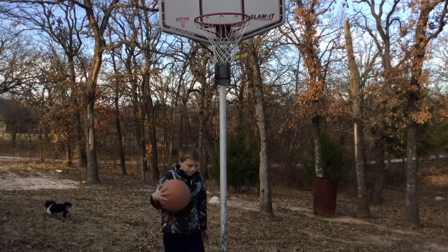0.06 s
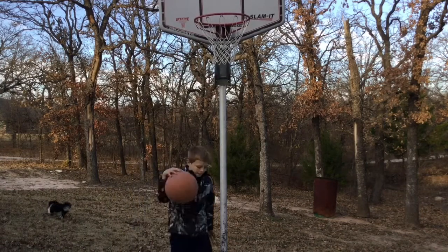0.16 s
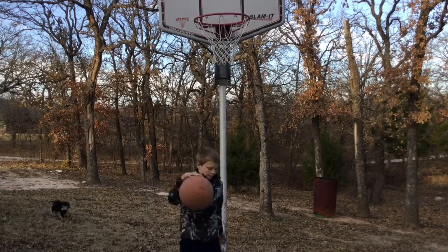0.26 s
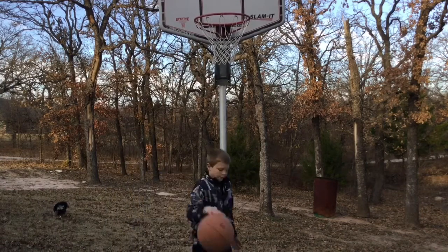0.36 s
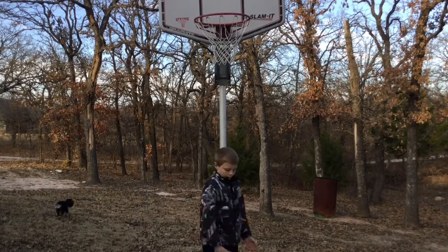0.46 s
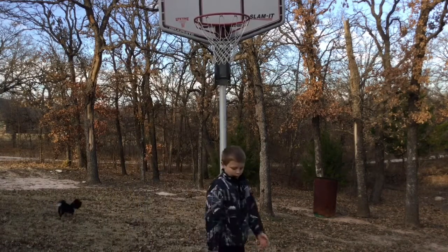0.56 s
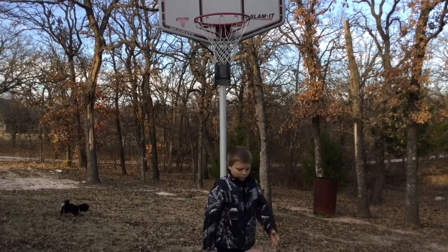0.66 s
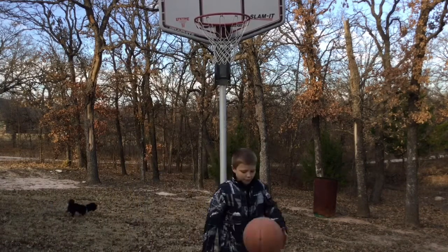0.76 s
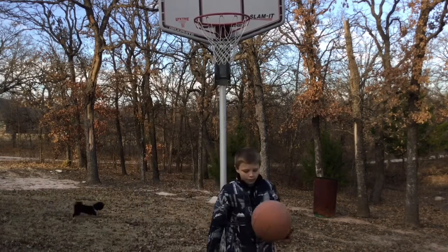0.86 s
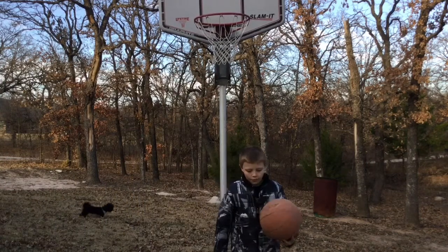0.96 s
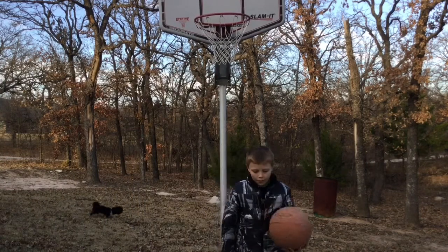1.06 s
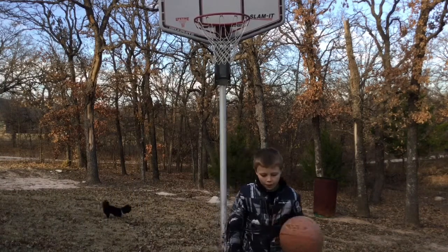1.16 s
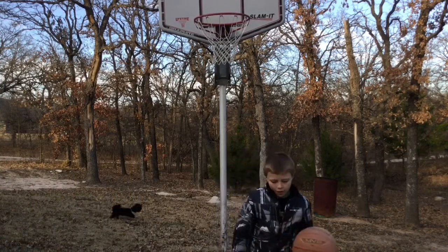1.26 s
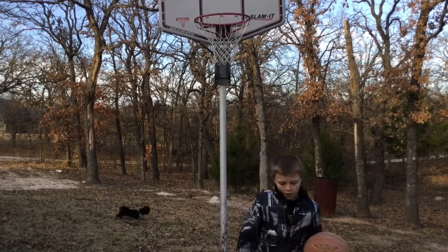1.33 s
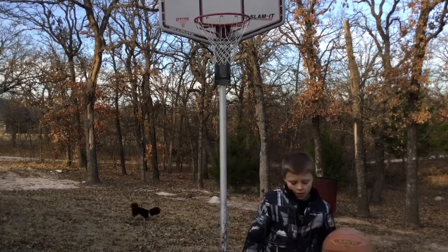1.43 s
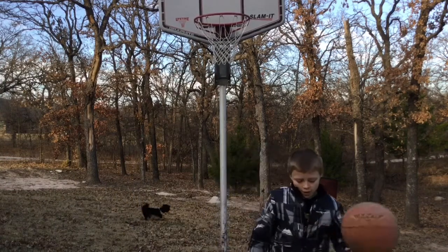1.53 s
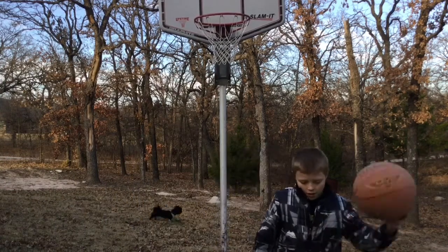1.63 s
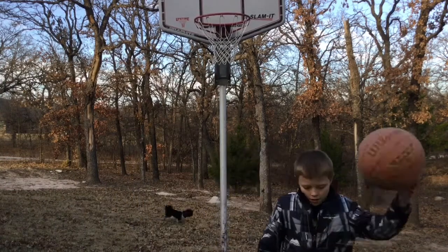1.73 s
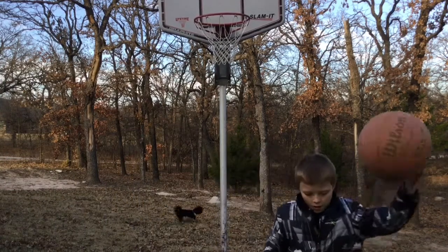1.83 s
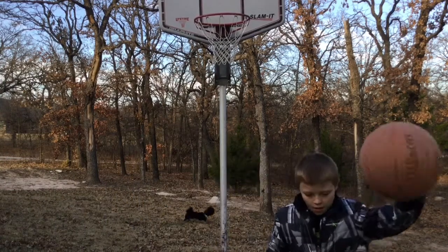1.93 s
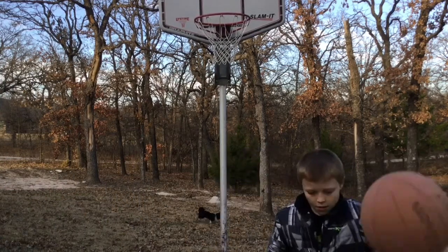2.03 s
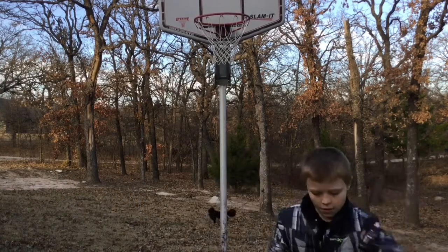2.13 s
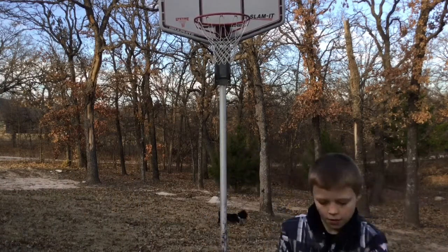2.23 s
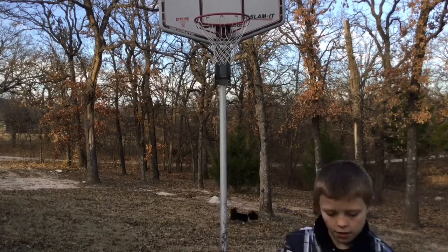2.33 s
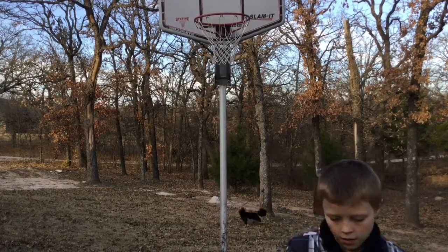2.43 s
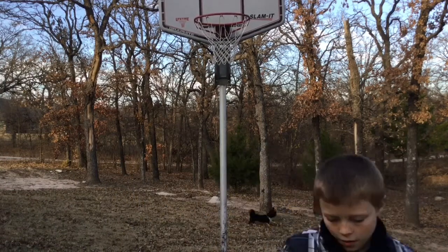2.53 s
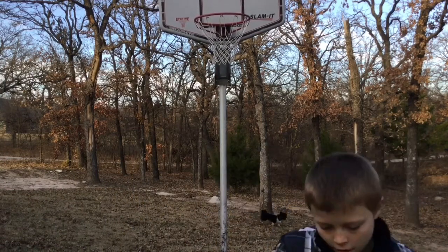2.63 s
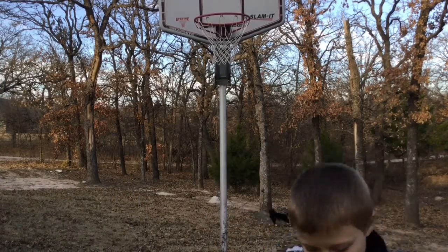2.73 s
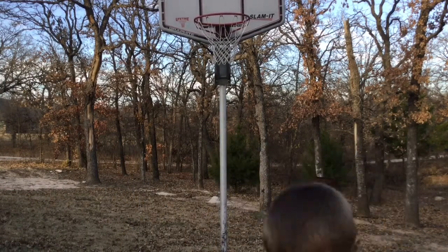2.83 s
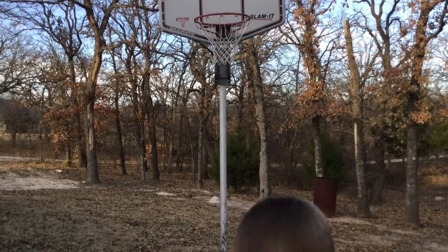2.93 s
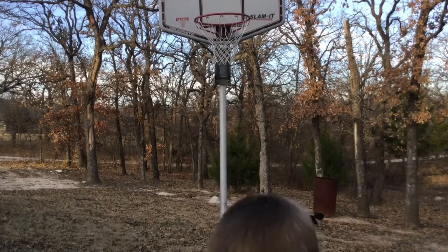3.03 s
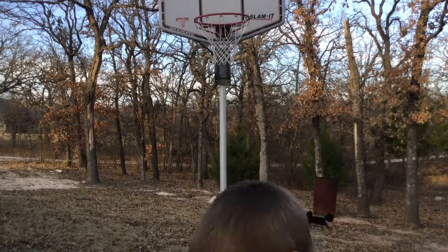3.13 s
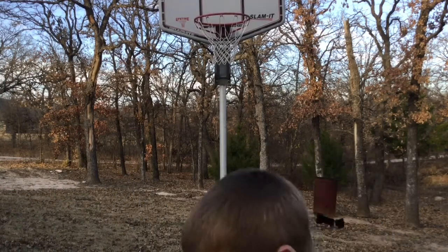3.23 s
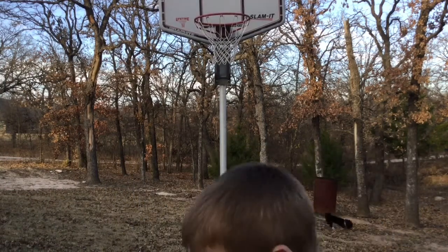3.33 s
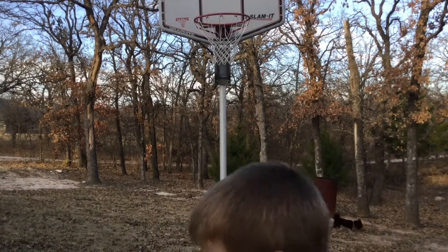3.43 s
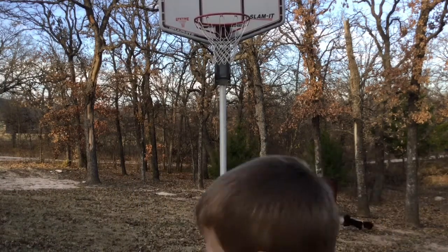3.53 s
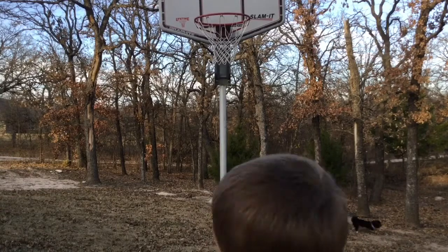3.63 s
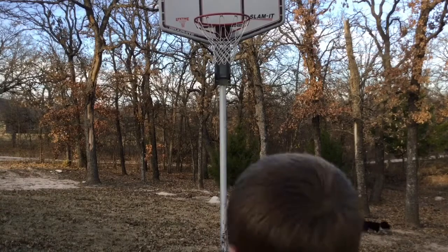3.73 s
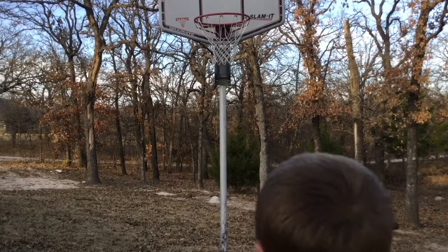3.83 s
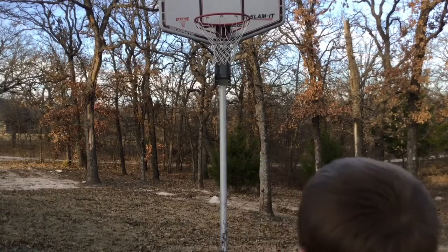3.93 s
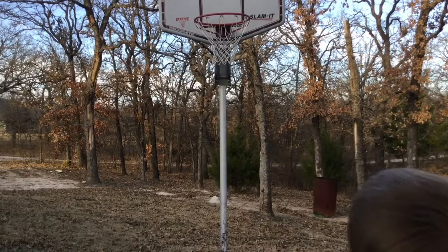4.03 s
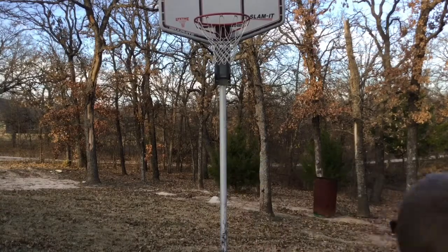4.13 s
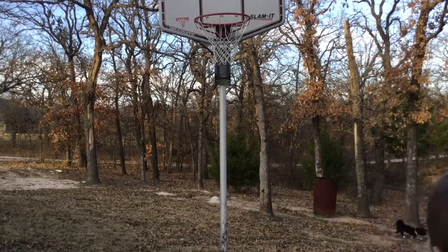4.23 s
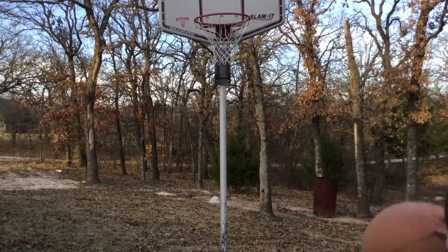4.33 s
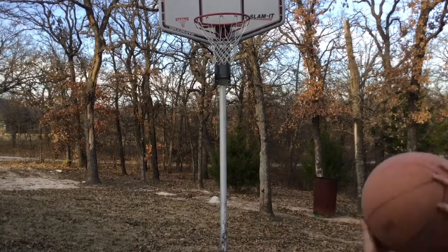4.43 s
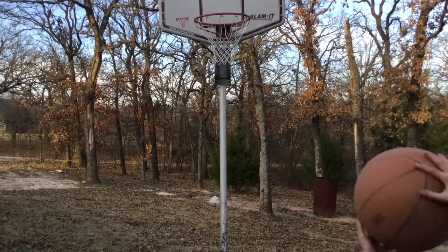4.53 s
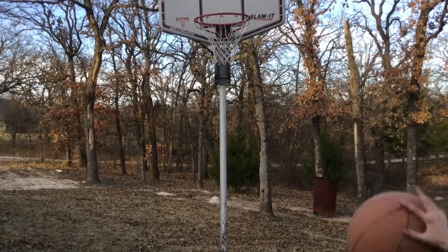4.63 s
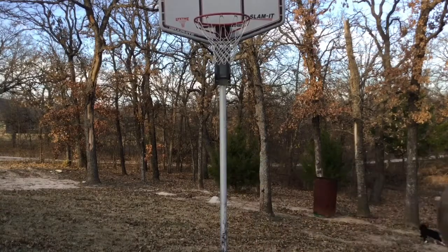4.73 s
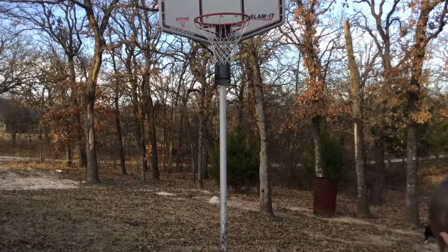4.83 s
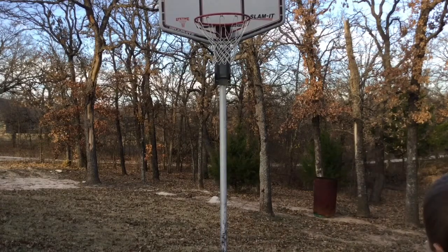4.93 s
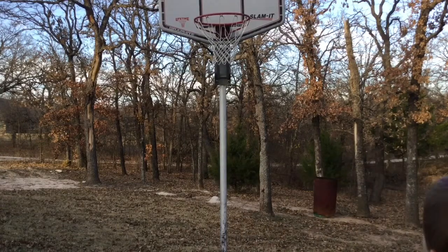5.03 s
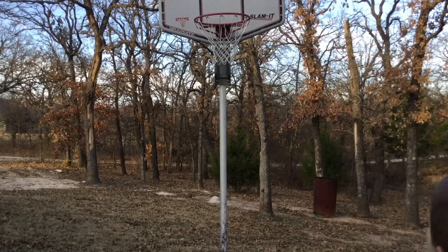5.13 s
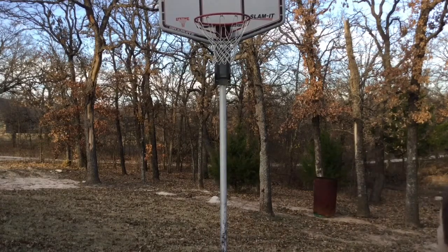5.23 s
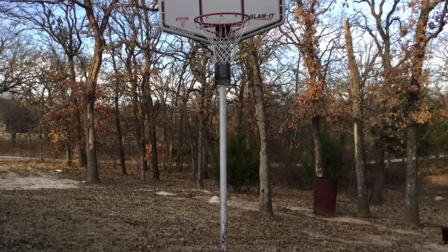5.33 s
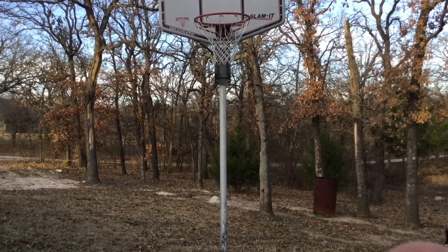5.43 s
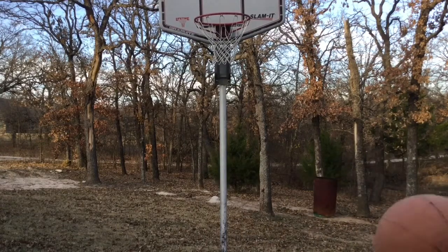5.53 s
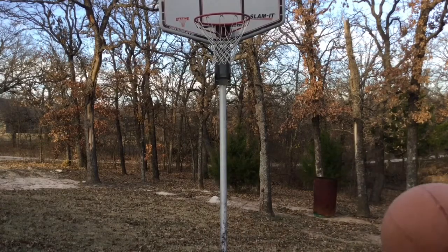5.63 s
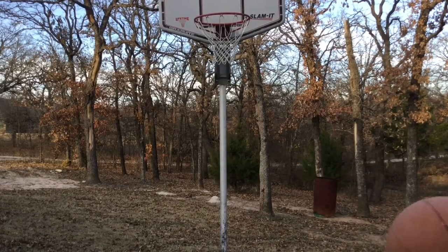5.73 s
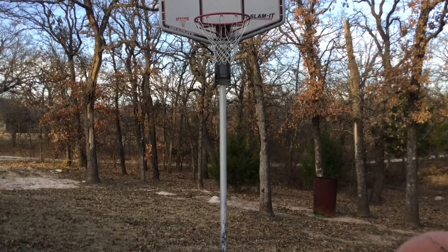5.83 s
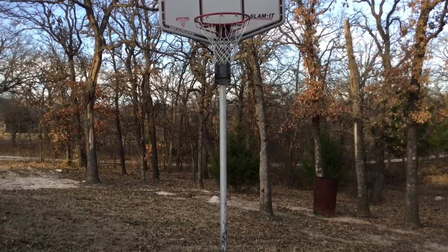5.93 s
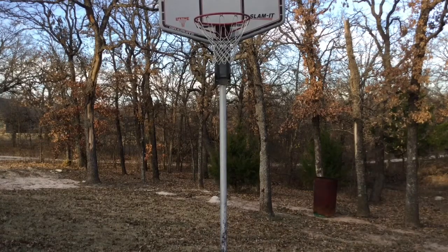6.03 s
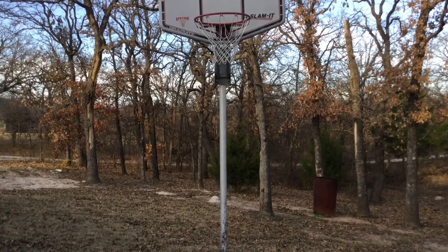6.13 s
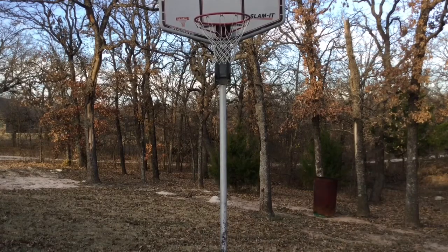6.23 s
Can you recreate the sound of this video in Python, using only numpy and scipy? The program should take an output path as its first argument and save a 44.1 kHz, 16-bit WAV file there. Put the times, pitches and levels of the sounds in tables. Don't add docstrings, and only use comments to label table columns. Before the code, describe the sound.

A basketball bounces three times on hard dry ground in a wooded yard, amid nylon jacket swishes, palm pats and crunching twigs underfoot.

```python
import sys
import numpy as np
from scipy import signal
from scipy.io import wavfile
from scipy.ndimage import uniform_filter1d

SR = 44100
rng = np.random.default_rng(int(sys.argv[2]) if len(sys.argv) > 2 else 0)


def to_wav(sig):
    pcm = np.clip(np.atleast_2d(sig), -1, 1) * 32767
    pcm = np.round(pcm).astype(np.int16)
    wavfile.write(sys.argv[1], SR, pcm.T)


def attenuation_scalar(level_db):
    decades = np.asarray(level_db, float) / 20
    return 10 ** decades


N = 276948

BALL_RADIUS_M = .1175
REDUCER_HZ, REDUCER_DEPTH_DB = 1600, -17
# root of the spherical cavity mode [-], level [dB], t60 [s]
CAVITY_MODES = [(2.08, 5, 0.14), (3.34, -11, 0.15), (4.51, -7, .2), (5.55, -11, 0.18), (5.92, -12, .6),
                (6.76, -15, .2), (7.23, -15, 0.25), (7.64, -17, .22), (8.44, -17, .22), (9.04, -16, .22)]


def at_hz(points, hz):
    table = np.array(points)
    return np.interp(np.log(hz), np.log(table[:, 0]), table[:, 1])


def band(x, low_hz, high_hz):
    edges = [low_hz, min(high_hz, .45 * SR)]
    return signal.sosfilt(signal.butter(2, edges, "band", fs=SR, output="sos"), x)


def rms_one(x):
    return x / np.sqrt(np.mean(x ** 2) + 1e-30)


def drift(rate_hz):
    steps = rng.standard_normal(int(N / SR * 60) + 2)
    memory = np.exp(-2 * np.pi * min(rate_hz, 25) / 60)
    slow = rms_one(signal.lfilter([1], [1, -memory], steps))
    return np.interp(np.arange(N) / SR * 60, np.arange(len(slow)), slow)


def resonate(x, peaks):
    out = 0
    for k, (hz, width_hz, db, late_ms) in enumerate(peaks):
        r = np.exp(-np.pi * width_hz / SR)
        poles = [1, -2 * r * np.cos(2 * np.pi * hz / SR), r * r]
        late = np.roll(x, int(late_ms * SR / 1000))
        ring = (1 - r * r) / 2 * signal.lfilter([1, 0, -1], poles, late)
        out = out + (-1) ** k * attenuation_scalar(db) * ring
    return out


def add(out, piece, s):
    i = round(s * SR)
    out[i:i + len(piece)] += piece[:N - i]


def cavity_hz(root):
    return root * 343 / (2 * np.pi * BALL_RADIUS_M)


def background(patchy_db=4.5, waver_db=2.0):
    # f [Hz], density [dB per Hz]
    air_colour = [(24, -61), (40, -33), (99, -12.5), (176, -4.5), (283, -3), (345, -1.5), (422, -19),
                  (600, -6), (697, -11.5), (1180, -15), (1760, -48), (2260, -48), (11800, -54.5),
                  (16000, -61)]
    # multiple of mains [-], level [dB rms]
    hum_partials = [(2, -70), (3, -64.5), (4, -70), (5, -88), (6, -75), (7, -82.5), (8, -71.5), (9, -74.5),
                    (10, -66), (12, -86), (14, -85.5), (18, -75.5), (20, -82)]
    t = np.arange(N) / SR
    edges = 40 * 2 ** np.arange(0, 8.7, 1 / 3)
    white = rng.standard_normal((2, N))
    air = 0
    for k, (low, high) in enumerate(zip(edges, edges[1:])):
        steep = band(band(white[k % 2], low, high), low / 1.2, high * 1.2)
        hiss_db = -REDUCER_DEPTH_DB * (low > REDUCER_HZ)
        patches_db = patchy_db * drift(4.1) * (hiss_db == 0)
        air = air + steep * attenuation_scalar(at_hz(air_colour, np.sqrt(low * high)) + hiss_db + patches_db)
    buzz = 0
    for multiple, db in hum_partials:
        level = np.sqrt(2) * attenuation_scalar(db + waver_db * drift(3.6))
        buzz = buzz + level * np.cos(2 * np.pi * multiple * 59.95 * t + 2.5 * drift(0.89))
    return attenuation_scalar(-59) * rms_one(air) + buzz


def whistles(calls, fall, blur_hz, rough):
    out = np.zeros(N)
    pole = np.exp(-2 * np.pi * blur_hz / SR)
    for s, length, hz, db in calls:
        t = np.arange(int(length * SR)) / SR
        slow = signal.lfilter([1], [1, -pole], rng.standard_normal((2, SR // 2)))
        a, b = slow[:, -len(t):]
        wander = 1 + rough * rms_one(a) + 1j * rough * rms_one(b)
        tone = np.real(wander * np.exp(2j * np.pi * hz * t * (1 - fall * t)))
        add(out, attenuation_scalar(db) * np.hanning(len(t)) * tone, s)
    return out


def bird():
    bird_calls = [(.522, 0.054, 3127, -63.5), (1.205, 0.03, 4600, -76), (5.981, 0.011, 3340, -60.5),
                  (5, 0.051, 4930, -78.5), (5.712, 0.03, 4185, -75.5), (5.81, .025, 5454, -71)]
    return whistles(bird_calls, fall=.26, blur_hz=90, rough=.7)


def twitter():
    more_calls = [(5.69, .05, 5050, -75), (5.735, .03, 2800, -74.5), (5.812, .04, 3300, -73.5),
                  (5.83, .05, 5450, -78), (5.975, .025, 4600, -78)]
    return whistles(more_calls, fall=.2, blur_hz=90, rough=0.897)


def creaks():
    finger_creaks = [
        (1.48, 0.39, 2305, -72),
        (1.70, 0.2, 2050, -69.5),
    ]
    return whistles(finger_creaks, fall=.05, blur_hz=130, rough=3)


def strokes_in_time(strokes, attack_s, release_db_per_s):
    s, length, level_db, swell_db = np.transpose(strokes)[:4, :, None]
    since = np.arange(0, N / SR, .001) - s
    length = np.maximum(length, .005)
    swelling_db = swell_db * np.clip(since / length, 0, 1)
    shape_db = level_db + swelling_db - release_db_per_s * np.maximum(since - length, 0)
    return attenuation_scalar(shape_db) * np.exp(np.minimum(since / attack_s - 1, 0))


def together(gains):
    total = np.sqrt(np.sum(gains ** 2, axis=0))
    return np.interp(np.arange(N) / SR * 1000, np.arange(len(total)), total)


def friction(strokes, colour, pivot_hz, attack_s, release_db_per_s, grit_db, grains_per_s, smooth,
             flutter_db, own_db):
    band_edges = [180, 380, 700, 1100, 1500, 2200, 3100, 4300, 6000, 8300, 11500, 16000]
    gains = strokes_in_time(strokes, attack_s, release_db_per_s)
    tilt_db = np.sum(np.array(strokes)[:, 4:], axis=1, keepdims=True)
    sizes = attenuation_scalar(grit_db * np.minimum(rng.exponential(1, N), 5))
    grains = (rng.random(N) < grains_per_s / SR) * sizes
    sources = rms_one(grains * rng.choice([-1, 1], (2, N))) + smooth * rng.standard_normal((2, N))
    flutter, out = drift(57), 0
    for k, (low, high) in enumerate(zip(band_edges, band_edges[1:])):
        hz = np.sqrt(low * high)
        if high > .8 * colour[0][0] and low < .9 * colour[-1][0]:
            hiss = rms_one(band(sources[k % 2], low, high)) * np.sqrt((high - low) / pivot_hz)
            level = attenuation_scalar(at_hz(colour, hz) + flutter_db * flutter + own_db * drift(19))
            out = out + hiss * level * together(gains * attenuation_scalar(tilt_db * np.log2(hz / pivot_hz)))
    return out


def crunches():
    steps = [(.155, 0.19, -68, 1.5, 3), (.79, 0.13, -66, -11, 13), (1.03, 0.15, -70.5, -2, -9),
             (2.22, 0.27, -70.5, 18, -2.5), (2.895, 0.024, -63, -4.5, 12), (3.34, 0.072, -63.5, 14.5, 2),
             (3.405, .1, -55, -7, -0.5), (3.78, 0.097, -56, -18, 0.5), (4.11, 0.079, -70, 2, -1.5),
             (4.21, 0.06, -70, 3.5, -6.5), (4.505, 0.038, -56.5, -12.5, 3.5), (4.98, .05, -79.5, 5, -2.5),
             (5.035, .11, -80, -5, -5.5), (5.69, .09, -79, -0.36, 2), (5.812, 0.11, -76.5, -7.5, 0)]
    litter = [(1000, -12.5), (1600, -1), (2600, 2.5), (3900, 1), (7100, -16.5), (8750, -22.5),
              (16000, -38.5)]
    return friction(steps, litter, pivot_hz=3042, attack_s=.007, release_db_per_s=405.5,
                    grit_db=1.5, grains_per_s=1500, smooth=.6, flutter_db=0.0, own_db=5.5)


def swishes():
    # t [s], length [s], level [dB], swell by the end
    # [dB], tilt [dB per octave]
    sleeve_slides = [(.02, 0.12, -63, -8.5, -4), (.15, 0.23, -58, -4, -4), (.415, 0.054, -55, -10.5, -4),
                     (.555, 0.032, -70.5, 19.5, -2.2), (.72, 0.13, -60.5, 4, -2.5), (.96, 0.19, -62.5, 2, -0.3),
                     (1.165, 0.062, -60.5, 6, 1), (1.275, 0.14, -50.5, -1.5, 0.8), (1.41, 0.034, -47, -5, 0.5),
                     (1.498, 0.11, -46, -3.5, -0.3), (1.61, 0.12, -55.5, -6, 4),
                     (1.705, 0.019, -45.5, -2, -1.5), (1.735, 0.2, -53, 2, 0.4), (1.96, 0.058, -63, 1, 6.5),
                     (2.07, 0.08, -55.5, -5, -1.1), (2.17, 0.069, -62, 12.5, 3.5), (2.215, 0.2, -50, -6, -0.9),
                     (2.44, 0.11, -57, -3, 1), (2.63, 0.016, -66, 3, 9), (2.665, .15, -63, 0, 7),
                     (2.83, 0.086, -65.5, 9, -5), (3.02, 0.02, -61.5, 5.5, -4),
                     (3.226, 0.022, -86, 9, 11), (3.554, 0.021, -71, -4, 13.5), (3.674, 0.028, -56.5, -10, 5),
               (3.713, 0.11, -54.5, 4.5, 0), (4.155, 0.013, -59.5, 3, -4.5), (4.228, 0.041, -66.5, 4, 14.5),
               (5.013, 0.022, -67, 1, 4), (5.71, .05, -85, -1, 1.5), (5.81, .09, -78.5, -4, 2.5)]
    nylon = [(1200, -12.5), (2200, -2.5), (2700, -12.5), (3600, -2.5), (6650, -2.5), (12000, -6),
             (16000, -8)]
    return friction(sleeve_slides, nylon, pivot_hz=7700, attack_s=0.036, release_db_per_s=749.0,
                    grit_db=1.5, grains_per_s=2000, smooth=.8, flutter_db=2.0, own_db=3.5)


def rubs():
    palm_strokes = [(.02, 0.031, -48, -13), (.155, 0.083, -52.5, 5), (.25, 0.079, -53, -2.5),
                    (.42, 0.089, -68, 5), (.72, 0.13, -59, 4), (1.81, 0.07, -57, -6),
                    (2.22, 0.29, -69.5, 5), (2.48, 0.27, -55.5, -11.5), (2.89, 0.13, -62.5, -3.5),
                    (3.17, 0.26, -58, 3), (4.5, 0.045, -57, 1), (5.0, 0.042, -62.5, -2.5)]
    rubber = [(250, 1.5), (450, -6), (950, -5), (1800, -6), (2800, -20.5), (5000, -35.5)]
    return friction(palm_strokes, rubber, pivot_hz=1010, attack_s=0.014, release_db_per_s=399.0,
                    grit_db=1.5, grains_per_s=710, smooth=0.75, flutter_db=2.5, own_db=3.5)


def moves(hum_db=-3.0):
    out = swishes() + crunches() + rubs()
    near = np.arange(N) < 3.5 * SR
    modes = [(cavity_hz(root), 14.0, hum_db + db, 0) for root, db, t60 in CAVITY_MODES]
    return out + resonate(out * near, modes)


def cracks(events, cycles, low_db, wide, rustle):
    out, t = np.zeros(N), np.arange(SR // 12) / SR
    noises = rng.standard_normal((len(events), len(t)))
    for (s, peak_db, hz), crack in zip(events, noises):
        burst = crack * (np.exp(-t * hz / cycles) + rustle * np.exp(-t / 0.012))
        burst[0] += 5.0
        narrow = band(burst, hz / 1.25, hz * 1.3)
        bright = narrow + wide * band(burst, max(1300, hz / 2.2), max(hz * 2.8, 2500))
        dull = band(crack * np.exp(-t / .004), 250, 1500)
        piece = bright / np.max(np.abs(bright)) + attenuation_scalar(low_db) * dull / np.max(np.abs(dull))
        add(out, attenuation_scalar(peak_db) * piece, s)
    return out


def ticks():
    # t [s], peak [dB], f [Hz]
    pats = [(0.1553, -27, 2500), (0.161, -38, 1280), (0.169, -46, 2870), (0.2445, -33.5, 2500),
            (0.2462, -30, 1310), (0.272, -50, 3500), (0.2965, -36.5, 1280), (1.8195, -34, 1490),
            (1.866, -38.5, 1990), (2.3268, -35, 1464), (2.757, -40.5, 1970), (2.867, -42.5, 1920),
            (3.344, -47, 2380)]
    # t [s], peak [dB], f [Hz]
    knocks = [(0.1535, -42, 1160), (0.186, -45, 554), (0.198, -39, 500), (0.2053, -33.5, 690),
              (0.2218, -32.5, 970), (0.2265, -35, 890), (0.351, -50, 540), (2.327, -38.5, 270)]
    # t [s], peak [dB], f [Hz]
    snaps = [(0.0252, -43.5, 7040), (0.1875, -50, 6000), (0.2025, -39.5, 4500), (0.2068, -36, 7500),
             (0.2166, -49, 6500), (0.2443, -31.5, 8000), (0.421, -59, 5000), (0.4245, -52, 6400),
             (0.4407, -27.5, 7450), (0.6968, -38.5, 8500), (1.0181, -49, 6550), (1.2135, -47.5, 3240),
             (1.2235, -51, 3400), (1.28, -38, 6670), (1.297, -38.5, 5150), (1.378, -43, 8000),
             (1.414, -35, 8500), (1.5088, -29, 9000), (1.527, -40, 5500), (1.551, -45, 7000),
             (1.59, -46, 6000), (1.708, -47, 6640), (1.7445, -48, 9000), (1.806, -34, 11000),
             (1.92, -42, 11000), (2.1778, -37, 5320), (2.4894, -37, 6910), (2.5436, -40, 10780)]
    # t [s], peak [dB], f [Hz]
    twigs = [(3.369, -47, 2400), (3.376, -47, 3670), (3.399, -44, 2960), (3.4035, -31.5, 2800),
             (3.4055, -34.5, 1800), (3.411, -39, 3280), (3.4193, -45, 2630), (3.445, -37, 4100),
             (3.454, -46, 3680), (3.48, -46, 4150), (3.5324, -48, 1928), (3.8187, -36, 3880),
             (3.9194, -52, 3440), (4.1265, -48.5, 3170), (4.1415, -45.5, 3100), (4.155, -37.5, 3100),
             (4.1739, -34, 3030), (4.1825, -34, 3220), (4.1914, -27, 2920), (4.2024, -31, 2930),
             (4.2684, -48, 3200), (4.5146, -43.5, 3390), (5.0255, -60, 2950)]
    # t [s], peak [dB], f [Hz]
    splinters = [(3.3855, -30.5, 4500), (3.388, -34, 4200), (3.428, -30.5, 4400), (3.5012, -35, 3510),
                 (4.17, -29, 3330), (5.9855, -56, 7000)]
    return (cracks(pats, cycles=2.6, low_db=-6, wide=0.3, rustle=.05)
            + cracks(knocks, cycles=1.5, low_db=-12, wide=0.15, rustle=.05)
            + cracks(snaps, cycles=8.2, low_db=-26, wide=0.5, rustle=0.1)
            + cracks(twigs, cycles=3.56, low_db=-18, wide=.2, rustle=0.072)
            + cracks(splinters, cycles=2.5, low_db=-25, wide=.4, rustle=0.042))


def ringing_air(waver_db=3.5, away_db=3.7, shell_db=-14):
    flights = [
        (.7, 0.36, -59.5, -17.5),
        (2.42, 0.53, -52, -10),
        (3.1, 0.29, -48, -11),
    ]
    drive = 5.2 * rng.standard_normal(N) * together(strokes_in_time(flights, 0.046, 300))
    peaks = [(2200, 660, shell_db, 0)]
    for root, db, t60 in CAVITY_MODES[2:]:
        peaks.append((cavity_hz(root), 35, -away_db * np.sqrt(3 * abs(root - 5.92)), 0))
    return sum(resonate(drive, [peak]) * attenuation_scalar(waver_db * drift(14)) for peak in peaks)


def woods(tilt_db, clumps_db=3.0):
    fade_times = [(100, 0.22), (250, 0.29), (700, 0.12), (2000, 0.4), (5000, 0.23), (12000, 0.26)]
    scatter_colour = [(100, -5.5), (250, 2.5), (400, 1), (580, -12), (1000, 1.5), (3000, -15.5),
                      (6000, -11.5), (11000, -25.5)]
    t, out = np.arange(SR) / SR, 0
    edges = 60 * 2 ** np.arange(0, 8.3, .5)
    clumps = np.interp(t, np.arange(250) / 250, rng.standard_normal(250))
    for low, high in zip(edges, edges[1:]):
        hz = np.sqrt(low * high)
        start_db = at_hz(scatter_colour, hz) + tilt_db * np.log2(hz / 1000)
        fade_db = start_db - 60 * t / at_hz(fade_times, hz)
        clump_db = clumps_db * clumps * min(hz / 1500, 1)
        out = out + band(rng.standard_normal(SR), low, high) * attenuation_scalar(fade_db + clump_db)
    return out * (1 - 0.2 * np.exp(-(t / 0.047) ** 2)) * 10


def slap_sound(contact, peaks):
    out = 0
    for k, peak in enumerate(peaks):
        out = out + (-1) ** k * band(resonate(contact, [peak]), peak[0] / 3.0, peak[0] * 2.0)
    return out


def ball_air(out, s, ring_db, t):
    for root, level_db, t60 in CAVITY_MODES:
        for split in (.996, 1.005):
            hz = split * cavity_hz(root)
            strength = attenuation_scalar(ring_db + level_db + rng.normal(0, 2.5) - 60 * t / t60)
            tone = np.sin(2 * np.pi * hz * t + rng.uniform(0, 2 * np.pi))
            add(out, strength * tone * np.minimum(t / 0.012, 1), s)


def bounces():
    hits = [
        (0.5815, 16.5, 41.5, -49),
        (2.3574, 17, 44.5, -36.5),
        (3.0417, 15.5, 40, -36.5),
    ]
    # wobble held [ms], choke [dB per ms], grit spray [dB], grit dies in [ms]
    lift_offs = [
        (16, .9, -32, 3.5),
        (20.1, 2.54, -27.5, 3.0),
        (21, 2, -31.5, 3.5),
    ]
    echo_delays = [(0.0145, 0.0335), (0.0185, 0.0365), (0.018, 0.037)]
    echo_levels = [(-17.5, -21.5, -19.5), (-20.5, -21, -20), (-21, -19.5, -18.5)]
    far_spreads = [220, 600, 500]
    # level [dB], tilt [dB per octave]
    scatters = [(-34, -2.5), (-34.5, -2), (-35.5, -3.5)]
    # later by [ms], level [dB]
    second_slaps = [(1.6, -10), (2.0, -6), (1.4, -6.5)]
    # f [Hz], width [Hz], level [dB], starts after [ms]
    slap_1 = [(743, 910, -4, 0.39), (1365, 360, 6.5, 0.19), (1810, 110, -3, .4), (2610, 190, 1.5, 0.883),
              (3993, 300, 0, .15), (5860, 1900, -17, .1), (7720, 3800, -33, .1), (12040, 2600, -41.5, .1)]
    # f [Hz], width [Hz], level [dB], starts after [ms]
    slap_2 = [(1010, 200, 5, 1.8), (1540, 270, 4.5, .9), (2500, 870, 2, .05), (5250, 570, -2, .1),
              (7294, 1500, -10.5, .1), (11100, 6900, -28.5, .1), (705, 200, -7.5, 0.17)]
    # f [Hz], width [Hz], level [dB], starts after [ms]
    slap_3 = [(890, 290, 1.5, 3.0), (1160, 160, 9, 2.8), (1970, 240, 4, 0.54), (3090, 230, 0.5, .1),
              (4180, 640, -3, .1), (5600, 1100, -19.5, 0.39), (9000, 1300, -72.5, .1)]
    # f [Hz], width [Hz], level [dB], starts after [ms]
    thump_1 = [(204.1, 42, 2, 0.44), (245.7, 28, 2, 0.2), (315.4, 25, -5.5, 0.24), (98.6, 48, -15.5, 0.76),
               (468, 36, -22, 0.22), (624, 110, -24, 0.83), (272, 29, -16.5, 0.15)]
    # f [Hz], width [Hz], level [dB], starts after [ms]
    thump_2 = [(172, 50, -5, 1.6), (245, 26, 2, 0.3), (339.9, 30, -8, 1), (106.85, 67, -10, 0.55),
               (440, 23, -21.5, 0.789), (660, 69, -11.5, 0.21), (300, 140, -20.5, 0.88)]
    # f [Hz], width [Hz], level [dB], starts after [ms]
    thump_3 = [(196, 49, -7, 0.99), (258, 20, 5.5, 0.35), (374, 24.7, -2, 0.51), (98, 40, -10, 0.66),
               (428, 35, -11, 0.51), (695, 56, -23.5, 0.075), (251, 85, -10, 0.66)]

    out, t = np.zeros(N), np.arange(SR // 2) / SR
    ms = t * 1000
    slaps, thumps = (slap_1, slap_2, slap_3), (thump_1, thump_2, thump_3)
    for k, (s, slap_db, thump_db, ring_db) in enumerate(hits):
        held_ms, choke_db, grit_db, grit_ms = lift_offs[k]
        near_s, far_s = echo_delays[k]
        near_db, far_slap_db, far_thump_db = echo_levels[k]
        spread = far_spreads[k]
        scatter_db, scatter_tilt_db = scatters[k]
        later_ms, later_db = second_slaps[k]

        noise = rng.standard_normal(len(t))
        contact = 0.04 * noise * np.exp(-t / 0.0018)
        contact[0] -= 1
        contact[int(later_ms * SR / 1000)] -= attenuation_scalar(later_db)
        push = np.sin(np.pi * np.minimum(t / 0.0012, 1)) ** 2 / (0.00089 * SR)
        grit = attenuation_scalar(grit_db) * band(noise[::-1], 2200, 15000) * np.exp(-ms / grit_ms)
        bright = attenuation_scalar(slap_db) * band(slap_sound(contact, slaps[k]), 150, 12000) + grit
        choked_db = thump_db - choke_db * np.clip(ms - held_ms, 0, 25)
        low = attenuation_scalar(choked_db) * resonate(push, thumps[k])
        add(out, bright + low, s)

        smear = rng.standard_normal(180) * np.hanning(180) / 8
        swell = np.sin(np.pi * np.sqrt(np.arange(spread) / spread))
        deep = noise[-spread:] * swell / np.sqrt(spread / 2)
        near_echo = np.convolve(band(bright + 2.6 * grit, 680, 14000), smear)
        far_echo = np.convolve(band(bright, 500, 9000), deep)
        add(out, attenuation_scalar(near_db) * near_echo, s + near_s - .002)
        add(out, attenuation_scalar(far_slap_db) * far_echo, s + far_s - .002)
        add(out, attenuation_scalar(far_thump_db - 0.5 * np.maximum(ms - 10, 0)) * low, s + far_s)
        add(out, attenuation_scalar(scatter_db) * woods(scatter_tilt_db), s)
        ball_air(out, s, ring_db, t)
    return out


def scene():
    far = background() + bird() + twitter()
    handling = creaks() + moves() + ticks() + ringing_air()
    return (far + handling + bounces())[None]


def reduce_noise(x, over=5.5, memory=.65, release=.45):
    hz, _, cells = signal.stft(x, SR, nperseg=1024, noverlap=768)
    now = np.abs(cells) ** 2
    power = np.maximum(signal.lfilter([1 - memory], [1, -memory], now), .5 * now)
    quiet = np.percentile(power, 15, axis=-1, keepdims=True)
    quiet = uniform_filter1d(quiet, size=9, axis=-2)
    gain = np.maximum(1 - over * quiet / (power + 1e-20), attenuation_scalar(REDUCER_DEPTH_DB))
    gain = np.maximum(gain, signal.lfilter([1 - release], [1, -release], gain))
    gain[:, hz < REDUCER_HZ] = 1
    return signal.istft(cells * gain, SR, nperseg=1024, noverlap=768)[1][:, :N]


def band_limit(x):
    return signal.sosfilt(signal.butter(12, 16810, fs=SR, output="sos"), x)


def record(dry):
    x = signal.sosfilt(signal.butter(2, 70, "high", fs=SR, output="sos"), dry)
    x = np.clip(x, -.92, .92)
    x = signal.sosfilt(signal.cheby2(10, 45, 16600, fs=SR, output="sos"), x)
    return band_limit(reduce_noise(x))


dry = scene()
out = record(dry)
to_wav(out)
```